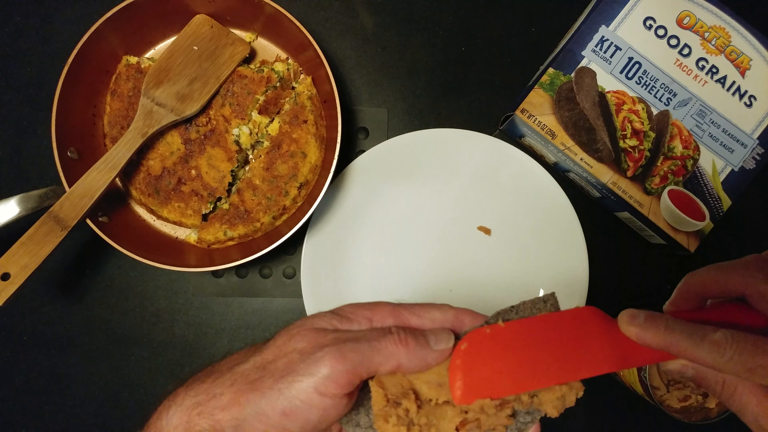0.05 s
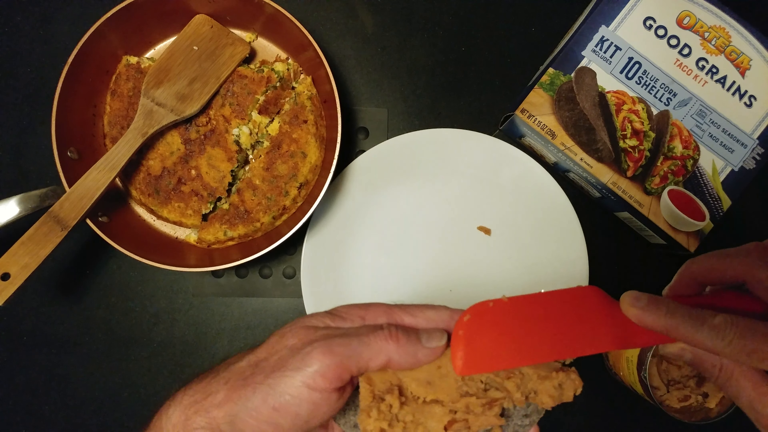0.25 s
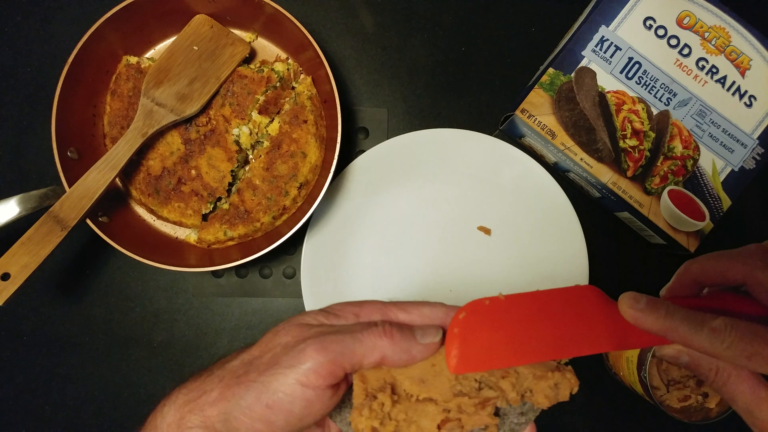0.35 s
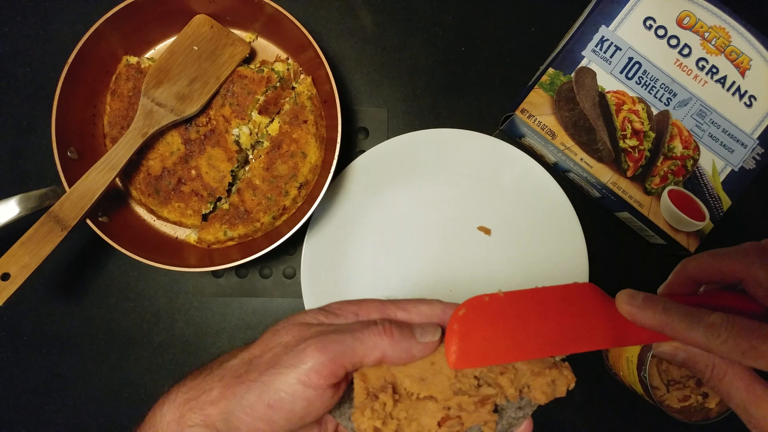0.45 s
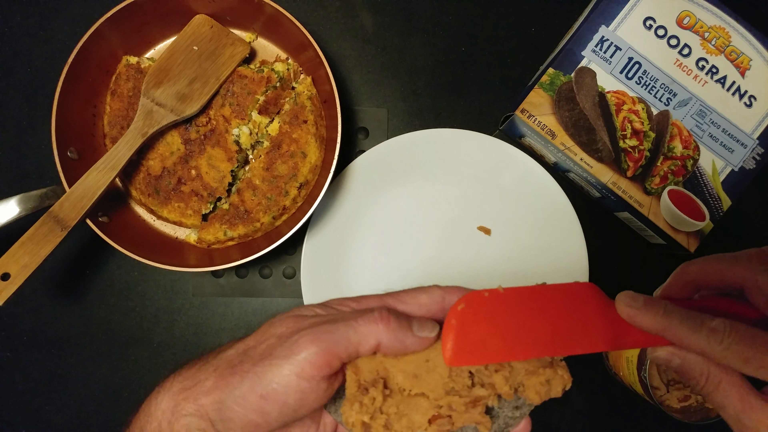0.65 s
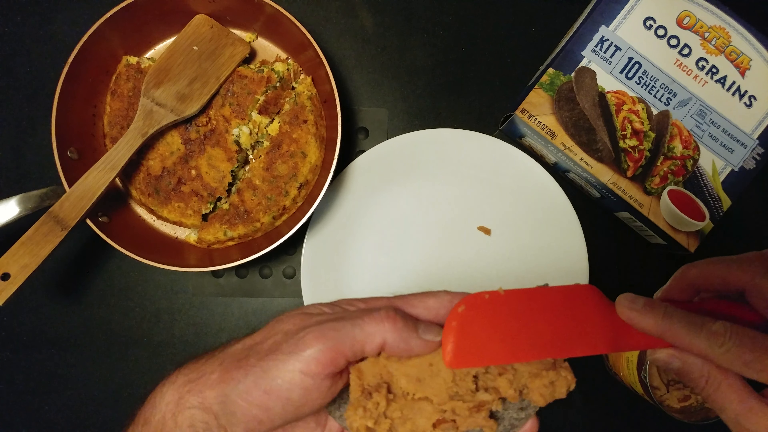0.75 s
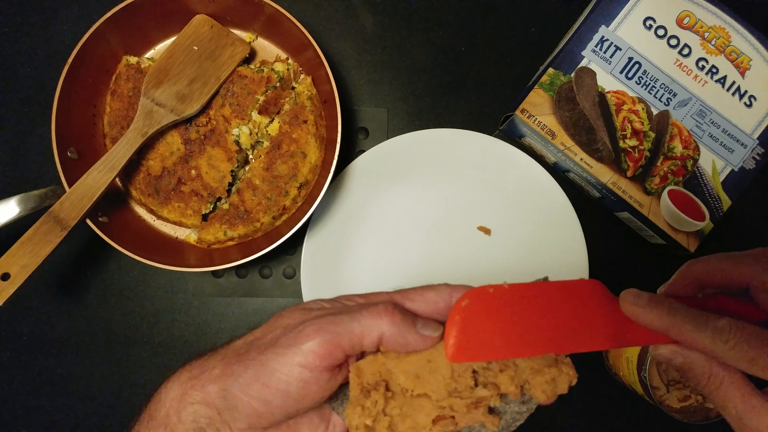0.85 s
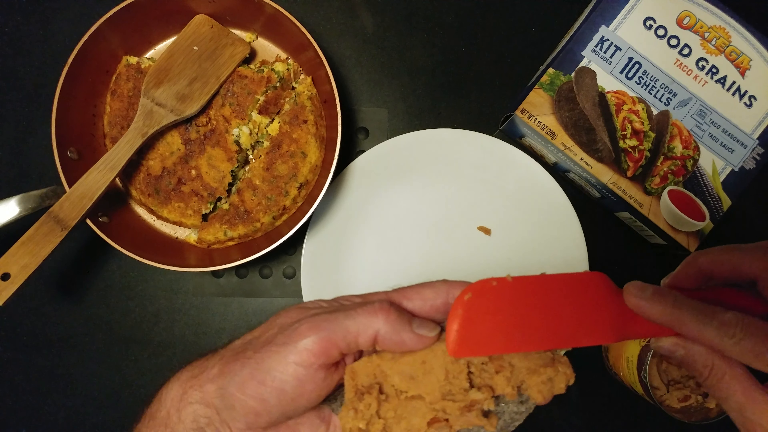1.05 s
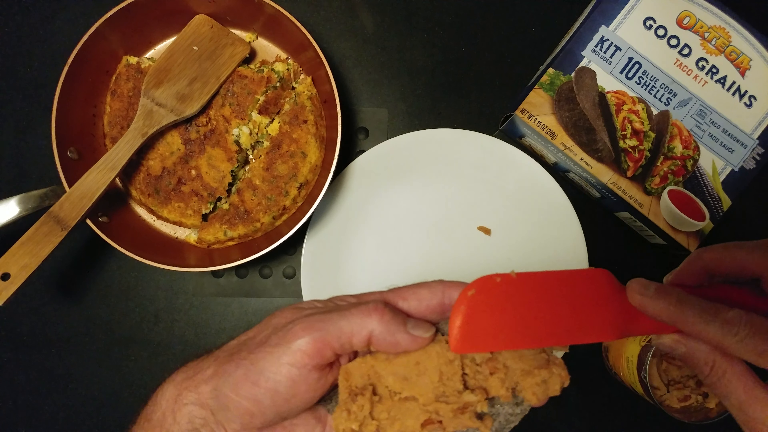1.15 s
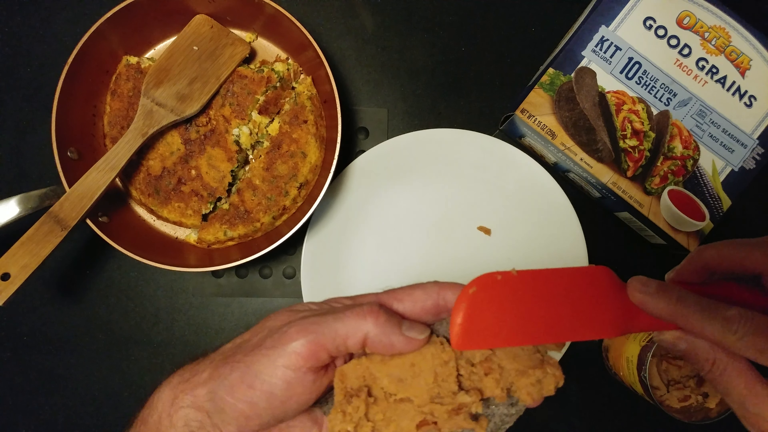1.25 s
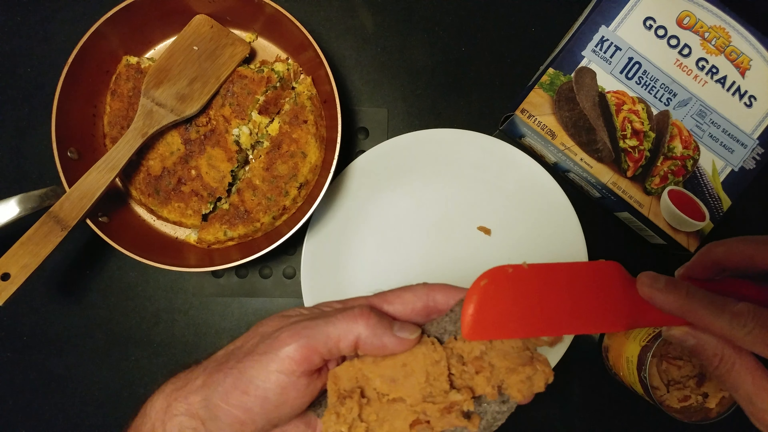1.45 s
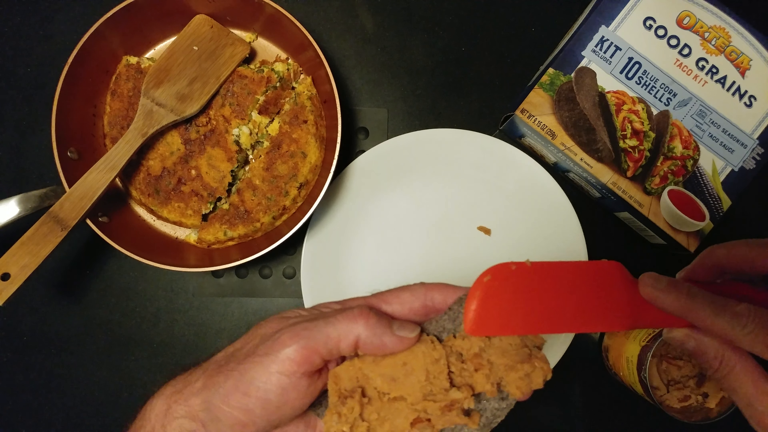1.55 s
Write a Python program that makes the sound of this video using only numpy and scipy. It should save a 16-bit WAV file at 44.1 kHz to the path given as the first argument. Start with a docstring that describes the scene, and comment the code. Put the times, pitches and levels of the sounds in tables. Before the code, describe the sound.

A crisp corn shell cracks sharply twice, then a soft spatula faintly drags and taps a plate

```python
"""Low appliance rumble and microphone hiss run throughout, as filtered noise in a spaced stereo pair.
A crisp corn shell ticks faintly, crackles briefly near 0.21 s as dense tiny slips, then cracks twice near
0.22 and 0.28 s: each snap rings its modes. The plate and counter echo each crack at once, as delayed copies;
the small kitchen follows, as sparse taps. From 0.62 s a soft spatula drags over the shell, as more slips,
and knocks the plate rim near 0.68 s, as decaying sines; faint ticks and drags follow."""
import sys
import numpy as np
from scipy import signal
from scipy.fft import rfft, irfft
from scipy.io import wavfile
from scipy.ndimage import uniform_filter1d

SR = 44100
rng = np.random.default_rng(int(sys.argv[2]) if len(sys.argv) > 2 else 0)


def unload_wav(signal):
    """Save mono or channel-first audio to the path in sys.argv[1] as 16-bit WAV at rate SR, clipped to [-1, 1]."""
    wavfile.write(
        sys.argv[1],
        SR,
        np.round(np.clip(np.atleast_2d(signal).T, -1, 1) * 32767).astype(np.int16),
    )


def ratio(d):
    """dB to gain"""
    e = np.asarray(d, float) / 20
    return 10 ** e


N = 70560
FFT_SIZE, RING_SAMPLES = 2048, 600


def evened(x):
    """Scale to unit rms."""
    return x / np.sqrt(np.mean(x ** 2) + 1e-20)


def read(points, hz):
    """Interpolate a (frequency, value) curve over log frequency."""
    f, value = np.transpose(points)
    return np.interp(np.log(hz + 1), np.log(f + 1), value)


def floor():
    """Appliance rumble and hiss: random short-time spectra with faint patches, partly alike in both channels."""
    # noise spectrum: (frequency [Hz], relative density [dB])
    floor_spectrum = [(21, -39), (35, -10.5), (59, -0.5), (80, -13), (112, 1.5), (148, -8), (197, -11.5),
                      (224, 3.5), (261, -12.5), (289, -4), (313, -15.5), (346, -5), (415, -3), (448, -13),
                      (510, -10), (551, -13), (832, -14.5), (1020, -22.5), (1220, -19), (1470, -25),
                      (5450, -33.5), (8450, -32.5), (11200, -35), (14900, -31), (16500, -44.5)]
    # likeness of the channels: (frequency [Hz], correlation [-1..1, clipped])
    floor_likeness = [(60, 0.23), (130, 1), (290, 0.74), (640, 0.51), (1410, -0.17), (3100, -0.0),
                      (6820, 0.61), (15000, -0.98)]
    # stereo balance: (frequency [Hz], left minus right [dB])
    floor_balance = [(60, -2.0), (110, 1), (200, 0.0), (380, 1), (700, 0.5), (1290, 1.0), (2380, -0.23),
                     (4400, 0.5), (8120, 0.27), (15000, -0.53)]
    level_db, patch_rms_db = -63.5, 1.5

    frames, hz = N // 512 + 5, np.fft.rfftfreq(2048, 1 / SR)
    a, b, c, d, patches = rng.standard_normal((frames, 1025, 5)).T
    patches = uniform_filter1d(patches, size=16, axis=0)  # over frequency
    patches = evened(uniform_filter1d(patches, size=6, axis=1))  # over time

    same = np.clip(read(floor_likeness, hz), -1, 1)[:, None]
    left = a + 1j * b
    right = same * left + np.sqrt(1 - same ** 2) * (c + 1j * d)
    side_db = read(floor_balance, hz)[:, None] / 2
    colour_db = read(floor_spectrum, hz)[:, None] + patch_rms_db * patches
    spectra = np.array([left, right]) * ratio(colour_db + np.array([side_db, -side_db]))
    noise = signal.istft(spectra, nperseg=2048, noverlap=1536)[1][:, :N]
    return ratio(level_db) * noise / np.std(noise.mean(0))


def ring(centre_hz, octaves, skirt):
    """Shell modes after one snap, weighted around a colour; minimum phase, peak near 1."""
    # shell modes: (frequency [Hz], width scale [Hz], left [dB], right [dB])
    shell_modes = [(700, 560, -14, -11.5), (1456, 680, -15.5, -33), (1760, 320, -18.5, -17),
                   (2600, 260, -8, -12), (3290, 710, -2, 0), (3970, 600, -10, -2.5), (4812, 620, 5.5, 0),
                   (5590, 450, 4, 4), (6310, 700, -7, -2), (8300, 900, -5.5, -10), (8800, 700, 1, -5.5),
                   (9380, 440, -0.5, -9.5), (12100, 900, -11.5, -12.5), (13200, 600, -6.5, -6.5),
                   (14700, 320, -10.5, -10), (15500, 1400, -14, -14.5)]
    hz, width_hz, *db = np.transpose(shell_modes)
    f = np.fft.rfftfreq(FFT_SIZE, 1 / SR)
    detuning = (f - hz[:, None]) / width_hz[:, None] * 2
    power = ratio(db) ** 2 @ (1 + detuning ** 2) ** -skirt
    colour_db = np.maximum(-6 * (np.log2((f + 1) / centre_hz) / octaves) ** 2, -70)

    # folding the cepstrum makes the response causal
    cepstrum = irfft(np.log(np.sqrt(power) * ratio(colour_db)))
    cepstrum[:, 1:FFT_SIZE // 2] *= 2
    spectrum = np.exp(rfft(cepstrum[:, :FFT_SIZE // 2 + 1], FFT_SIZE))
    response = irfft(spectrum)[:, :RING_SAMPLES]
    return response / np.sqrt((response ** 2).max(axis=1).mean())


def cracks():
    """Single snaps ring the shell; returns the sound and the part thrown at the plate."""
    # crack moments: time [s]
    crack_times_s = [.0266, .1727, .1995, .2082, .2211, .2217, .2221, .27607, .6535, .6735, 1.0538]
    # cracks in that order: (level before echoes [dB], colour centre [Hz], breadth [octaves],
    # left minus right [dB], send to plate [dB])
    crack_list = [(-41, 10500, 0.5, 9.5, -8.5), (-47, 4200, 2.6, 2, -22), (-43, 12000, .7, 1.5, 0),
                  (-30.5, 7000, 1.2, 2, -1), (-12.5, 3960, 1.8, 5, 0), (-15.5, 4800, 1.4, -4.5, -5),
                  (-15.5, 5100, 1.1, 8.5, -1.5), (-4, 5400, 1.19, -0.3, -1.4), (-57, 35000, 0.34, 2, -3.5),
                  (-31, 12200, .5, 4, -20), (-57.5, 14000, 0.4, 11, -3)]
    out = np.zeros((2, 2, N + RING_SAMPLES))
    for start_s, (db, hz, octaves, pan_db, plate_db) in zip(crack_times_s, crack_list):
        gain = ratio([[db + pan_db / 2], [db - pan_db / 2]])
        snap = gain * ring(hz, octaves, skirt=1.5)
        out[:, :, round(start_s * SR):][..., :RING_SAMPLES] += [snap, ratio(plate_db) * snap]
    return out[..., :N]


def echoed(x, table):
    """Short paths sum, each with its own delay, level and lift or dip of the treble."""
    lift_hz, lift_octaves = 9000, 0.4
    hz, lead = np.fft.rfftfreq(FFT_SIZE, 1 / SR), FFT_SIZE // 32
    lift = np.exp(-(np.log2((hz + 1) / lift_hz) / lift_octaves) ** 2)
    paths = 0
    for left_ms, right_ms, left_db, right_db, lift_db in table:
        # the lead leaves room for fractional-delay ripples; it is cut off below
        delay_s = np.array([[left_ms], [right_ms]]) / 1000 + lead / SR
        gain = ratio(np.array([[left_db], [right_db]]) + lift_db * lift)
        paths = paths + gain * np.exp(-2j * np.pi * hz * delay_s)
    return signal.oaconvolve(x, irfft(paths), axes=1)[:, lead:N + lead]


def nearby(x):
    """Direct sound, then reflections from counter and walls."""
    # paths: (left delay [ms], right delay [ms], left [dB], right [dB], lift around 9 kHz [dB])
    near_paths = [(0.0, 0.069, -2.05, 5.7, -1), (3.2, 2.6, -16, -16, -1), (6.5, 6.5, -13, -13.5, -3),
                  (7.9, 7.9, -17, -16, 11), (12.1, 11.6, -18.5, -21, -3.2)]
    return echoed(x, near_paths)


def plate(x):
    """The plate below the shell reflects what is thrown at it."""
    # path: (left delay [ms], right delay [ms], left [dB], right [dB], lift around 9 kHz [dB])
    plate_path = [(1.6, 1.7, -1, -11, 5)]
    return echoed(x, plate_path)


def room(x):
    """Sparse echoes of random sign, some standing out, each band dying at its own speed."""
    # decay: (frequency [Hz], t60 [s])
    room_decay = [(1500, 0.13), (3000, 0.17), (5500, 0.21), (9000, .2), (15000, 0.18)]
    # tail colour: (frequency [Hz], relative level [dB])
    room_colour = [(1000, 4.5), (2500, -3.5), (5000, -9.5), (9000, -5), (15000, 0)]
    level_db, start_s, shared, spread_db = -1.5, 0.004, 0.12, 2.5
    length, spacing = SR // 2, 12

    taps = np.zeros((2, length))
    at = np.arange(0, length - spacing, spacing) + rng.integers(0, spacing, (2, (length - 1) // spacing))
    strength = ratio(spread_db * rng.exponential(1, at.shape))
    np.put_along_axis(taps, at, rng.choice([-1., 1.], at.shape) * strength, 1)
    taps *= np.clip(np.arange(length) / SR / start_s - 1, 0, 1)  # silent to start_s, full at twice that
    taps += shared * taps[::-1]

    hz, t, z = signal.stft(taps, SR, nperseg=128)
    decay_db = -60 * t / read(room_decay, hz)[:, None]
    z = z * ratio(read(room_colour, hz)[:, None] + decay_db)
    tail = signal.istft(z, SR, nperseg=128)[1]
    return ratio(level_db) * signal.fftconvolve(x, tail / np.linalg.norm(tail[0]), axes=1)[:, :N]


def crackle_and_drags():
    """Dense tiny slips ring the shell: first a short crackle, then strokes of the blade."""
    # crackle, then strokes: (start [s], rise [s], hold [s], fall [s], level before pan and echoes [dB],
    # colour centre [Hz], breadth [octaves])
    slip_bursts = [(.2081, .0008, .0032, .001, -35, 5800, 1.0), (.622, .03, .015, .012, -58, 7500, 1.2),
                   (.68, .01, .05, .08, -72, 2500, 1.2), (.738, .006, .02, .03, -72, 8600, .25),
                   (.805, .02, .03, .02, -66, 3000, 1.3), (.812, .015, .025, .02, -67, 9500, .5),
                   (1.06, .01, .015, .02, -74, 6000, .8), (1.2, .03, .02, .04, -78, 7500, .3),
                   (1.31, .04, .05, .06, -78, 8500, .3)]
    slips_per_s, slip_spread_db, pan_db = 12000, 2.0, 3
    t, out = np.arange(N) / SR, np.zeros((2, N))
    slips = (rng.random(N) < slips_per_s / SR) * rng.choice([-1, 1], N)
    slips = slips * ratio(slip_spread_db * rng.exponential(1, N))
    for start_s, rise_s, hold_s, fall_s, db, hz, octaves in slip_bursts:
        end_s = start_s + rise_s + hold_s + fall_s
        envelope = np.clip(np.minimum((t - start_s) / rise_s, (end_s - t) / fall_s), 0, 1)
        rub = signal.oaconvolve(slips[None], ring(hz, octaves, skirt=0.62), axes=1)[:, :N]
        out += ratio(db) * envelope * evened(rub)
    return out * ratio([[pan_db / 2], [-pan_db / 2]])


def knocks():
    """Dull contacts of the blade ring the plate rim's few modes."""
    # contacts: (time [s], level [dB])
    contacts = [(.6750, -46.5), (0.677, -57)]
    # rim modes: (frequency [Hz], left [dB], right [dB], t60 [s])
    rim_modes = [(1537, 5.5, 1, 0.0068), (2610, 7, 1.5, 0.0078), (4380, 8, 5.5, 0.0076),
                 (5160, 10, -16, 0.0072)]
    rise_s, length = 0.00061, 2 * RING_SAMPLES
    hz, *db, t60_s = np.transpose(rim_modes)
    t, out = np.arange(length)[:, None] / SR, np.zeros((2, N))
    modes = np.minimum(t / rise_s, 1) * ratio(-60 * t / t60_s) * np.sin(2 * np.pi * hz * t)
    rim = ratio(db) @ modes.T
    for start_s, knock_db in contacts:
        out[:, round(start_s * SR):][:, :length] += ratio(knock_db) * rim
    return out


def scene():
    """Sum the close sounds with their reflections, the plate, the room and the floor."""
    slips_to_plate_db = -5.5
    snaps, at_plate = cracks()
    slips = crackle_and_drags()
    close = snaps + slips + knocks()
    plate_echo = plate(at_plate + ratio(slips_to_plate_db) * slips)
    return nearby(close) + plate_echo + room(close) + floor()


def band_limit(x):
    """A steep low-pass at the top of the band."""
    return signal.sosfilt(signal.butter(12, 16990, fs=SR, output="sos"), x)


def record(dry):
    """Band-limit the mix with a linear-phase low-pass."""
    edge = signal.firwin(numtaps=127, cutoff=16300, window=("kaiser", 8), fs=SR)
    mix = signal.oaconvolve(dry, edge[None], "same")
    return band_limit(mix)


dry = scene()
out = record(dry)
unload_wav(out)
```